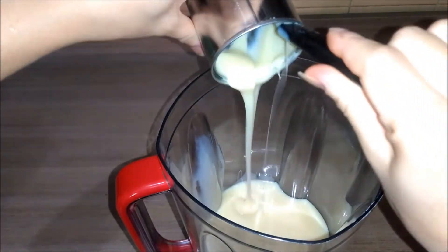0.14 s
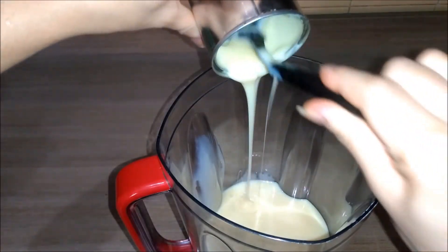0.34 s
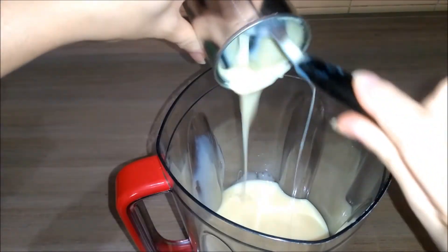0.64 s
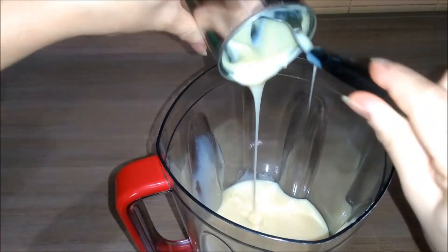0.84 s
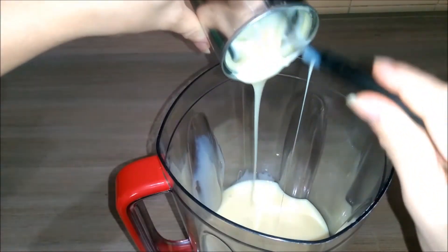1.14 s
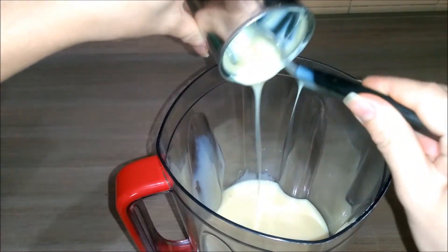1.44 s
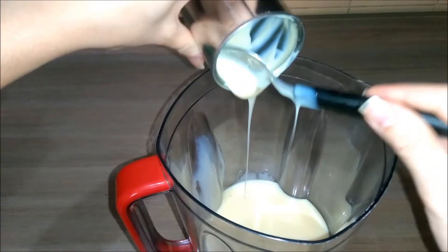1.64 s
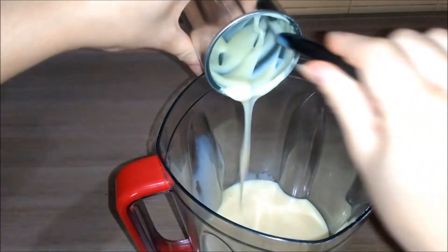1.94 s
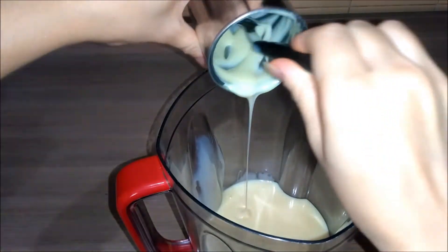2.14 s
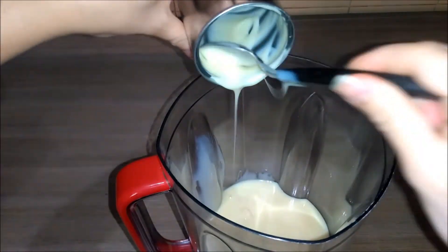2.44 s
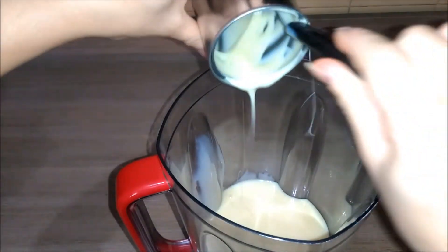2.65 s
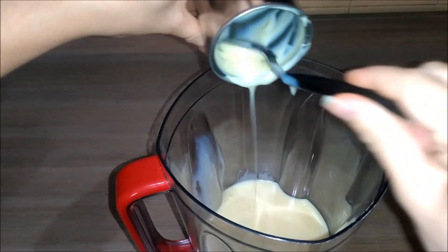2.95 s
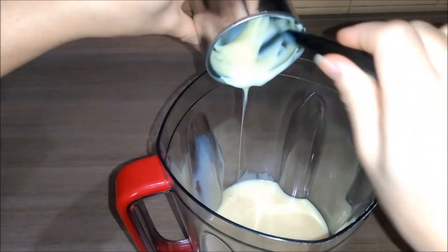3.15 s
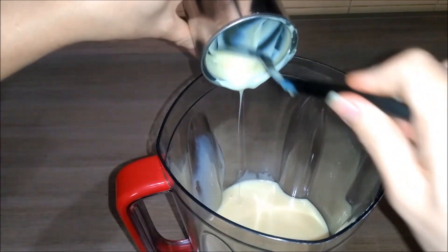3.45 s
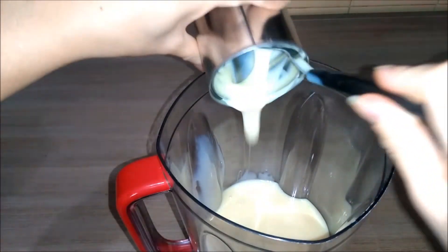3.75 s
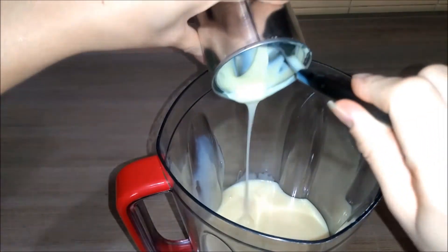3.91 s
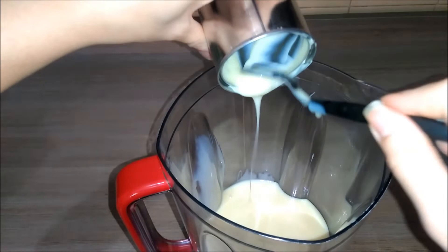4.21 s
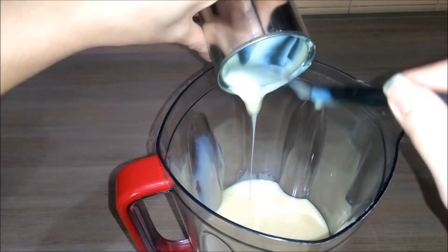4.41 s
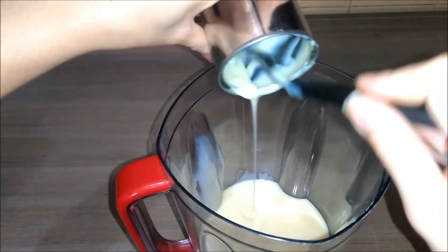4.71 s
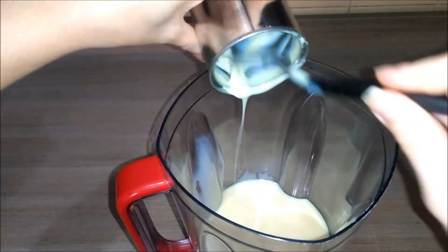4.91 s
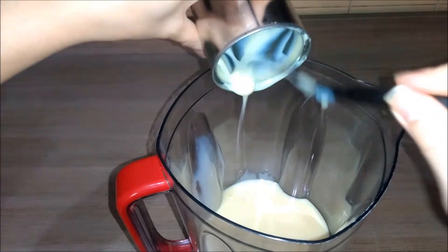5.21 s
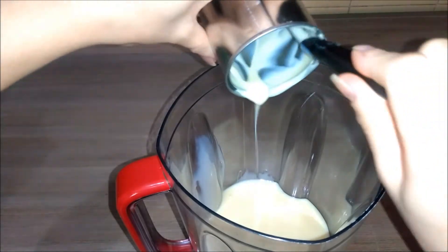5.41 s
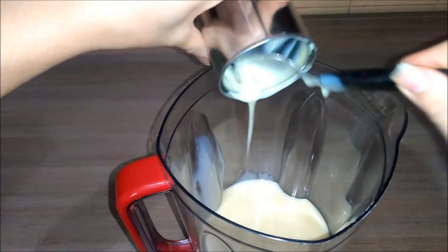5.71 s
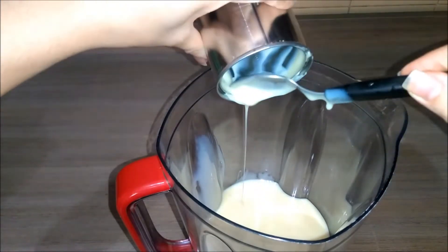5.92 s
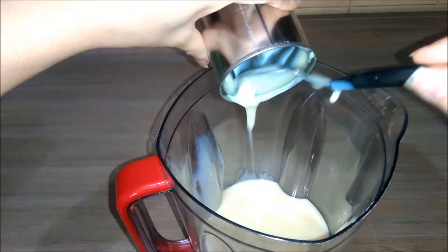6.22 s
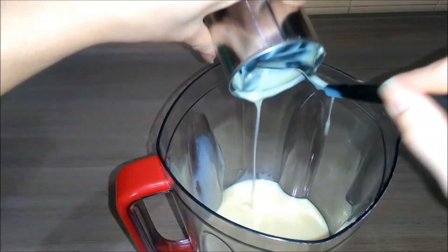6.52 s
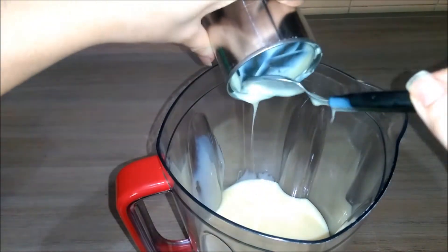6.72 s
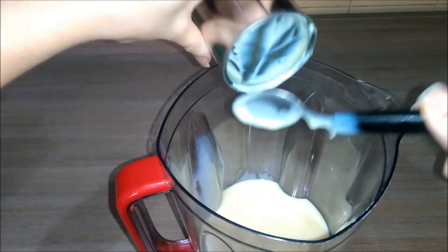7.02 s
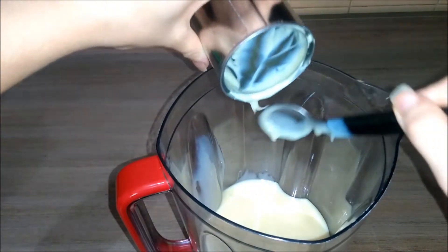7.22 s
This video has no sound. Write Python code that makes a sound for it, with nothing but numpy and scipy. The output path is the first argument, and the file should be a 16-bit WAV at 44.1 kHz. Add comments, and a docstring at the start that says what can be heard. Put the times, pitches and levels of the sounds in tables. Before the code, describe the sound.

Close in a quiet small kitchen, a spoon works around a sticky tin: sharp tinny taps, short gritty scrapes with a wet hiss, faint thin squeaks and soft hand rustle. Two drum-like pops ring out before halfway. Later strokes crowd together, low and groaning, with a weak low hum beneath, ending in two small steel tings. Stereo pickup, brief room tail.

```python
"""A steel spoon scrapes thick, sticky milk out of a hand-held tin in a small kitchen, close to a stereo microphone.
Stick-slip friction rubs the tin's drum-like bottom, its wall and its bright upper modes; the smeared paste hisses.
Knocks ring the same modes as short blows; the bottom twice pops back, flicked steel tings and thin squeaks sing.
Hands rustle on the tin. The room answers with short noise tails, over shaped quiet noise and
low hums made of wavering sines that come and go."""
import sys
import numpy as np
from scipy import signal
from scipy.fft import rfft, irfft, next_fast_len
from scipy.io import wavfile
from scipy.ndimage import uniform_filter1d, map_coordinates

SR = 44100
rng = np.random.default_rng(int(sys.argv[2]) if len(sys.argv) > 2 else 0)


def put_to_file(sound):
    """Save the sound as 16-bit audio at rate SR, in the file named by the first command-line argument."""
    columns = np.atleast_2d(sound).T  # one column per channel
    safe = np.clip(columns, -1, 1)
    whole_steps = np.round(safe * 32767)
    wavfile.write(sys.argv[1], SR, whole_steps.astype(np.int16))


N = 324576
TIME = np.arange(N) / SR
TAIL = TIME[:SR // 2]  # clock of one struck sound
STEP_S = TIME[::SR // 1000]  # coarse clock for the hand's pressure

# Modes of the tin's bottom. Each row: frequency in Hz, relative level in dB, decay by 60 dB in seconds.
BOTTOM = [(353, 11, 0.16), (381, 9, 0.07)]
# Overtones of the bottom, near the octave. Each row: frequency in Hz, relative level in dB, 60 dB decay in seconds.
OVERTONE = [(700.5, 2, 0.15), (745, -16, 0.17), (722, -5.5, 0.096)]
# Modes of the tin's wall. Each row: frequency in Hz, relative level in dB, 60 dB decay in seconds.
WALL = [(915, 12, 0.034), (1008, 17.5, 0.032), (1099, 12.5, 0.042), (1196, 11.5, 0.04), (1334, 5, 0.072),
        (1577, 2, 0.094), (1682, 11.5, 0.062), (1893, 2, 0.073)]
# Thin, faint rings of the steel. Each row: frequency in Hz, relative level in dB, 60 dB decay in seconds.
STEEL = [(3165, 0, 0.5), (3295, -2, 0.33), (3892, -5, 0.35), (3973, -7, 0.4), (4436, -5, 0.4),
         (4566, 2, 0.42), (5408, -5, 0.35), (5782, -5, 0.35), (6551, -5, 0.22), (8413, -5, 0.27)]
# Spoon sweeps through the paste. Each row: start in seconds, length in seconds, levels in dB of wall,
# rasp of steel and hiss of paste, swell of rasp and hiss over the sweep in dB (negative: they sink).
SWEEPS = [(0, 0.071, -45, -50, -59.5, -16.5), (0.289, 0.13, -46, -30.5, -37.5, 6.5),
          (0.611, 0.049, -49, -35.5, -44, -3), (0.713, 0.19, -51, -52, -56.5, 2),
          (1.177, 0.01, -38, -45, -50.5, -11.5), (1.23, 0.13, -51.5, -51, -52.5, 1),
          (1.38, 0.2, -62, -55.5, -59, 3), (1.902, 0.093, -59, -68, -60, -4.5),
          (2.02, 0.095, -74, -50, -62, 3), (2.205, 0.2, -46.5, -31, -37, 18.5),
          (2.788, 0.12, -55, -45, -43.5, 14.5), (3.245, 0.25, -72.5, -44.5, -49.5, 10.5),
          (3.934, 0.17, -50.5, -44.5, -56.5, 3.5), (4.178, 0.094, -36.5, -37.5, -42.5, 3),
          (4.706, 0.086, -47.5, -44.5, -52, -7.5), (5.079, 0.037, -47, -30, -30.5, 3.5),
          (5.31, 0.0086, -39, -38, -43, -1), (5.388, 0.13, -56, -55.5, -58.5, -9.5),
          (5.526, 0.29, -45, -38, -50, 4), (6.27, 0.12, -47, -39.5, -67, 2),
          (6.529, 0.024, -33, -30, -39, 1.5)]
SWEEP_ATTACK_S = 0.057  # pressure builds up over this time ahead of a sweep's start


def undb(db):
    """Decibels to gain."""
    return np.exp(np.asarray(db) * (np.log(10) / 20))


def unit(x):
    """Scale to rms 1."""
    return x / np.sqrt(np.mean(x ** 2))


def colour(x, points):
    """Filter by a spectrum of (Hz, dB) points."""
    hz, db = np.transpose(points)
    size = next_fast_len(x.shape[-1] + 2048)
    f = np.fft.rfftfreq(size, 1 / SR)
    gain = undb(np.interp(np.log(f + 1), np.log(hz), db))
    return irfft(rfft(x, size) * gain, size)[..., :x.shape[-1]]


def through(x, response):
    """Convolve, keeping the length."""
    return signal.fftconvolve(x, response)[:len(x)]


def fade(t60):
    """Decay of 60 dB in t60 seconds, never shorter than 1 ms."""
    return np.exp(-np.log(1000) * TAIL / max(t60, 1e-3))


def walk(rate):
    """Random wandering: straight lines between normal random points, rate points a second."""
    knots = rng.standard_normal(4096)
    return np.interp(TIME * rate, np.arange(len(knots)), knots)


def ring(modes, bend=0., rise_s=1e-4):
    """Damped modes; the spoon's pressure stiffens the sheet and lifts their pitch at first."""
    clock = TAIL + bend * 0.022 * (1 - np.exp(-TAIL / 0.015))
    out = sum(undb(db) * fade(t60) * np.sin(2 * np.pi * hz * clock) for hz, db, t60 in modes)
    return out * (1 - np.exp(-TAIL / rise_s))


def struck(modes, centre_hz, focus_db, detune):
    """Each contact point favours the modes near one pitch and detunes them a little."""
    chance = np.clip(rng.standard_normal(len(modes)), -2, 2)
    return [(hz * (1 + detune * c), db - focus_db * np.log2(hz / centre_hz) ** 2, t60)
            for (hz, db, t60), c in zip(modes, chance)]


def radiate(x, corner_hz):
    """A small sheet of metal gives off almost no bass."""
    return signal.sosfilt(signal.butter(3, corner_hz, "high", fs=SR, output="sos"), x)


def diffuse(size):
    """Stereo noise from all around: most alike in the low middle, where the side signal is weak."""
    mid, side = rng.standard_normal((2, size))
    side = colour(side, [(130, 5.5), (350, -8.0), (750, -7.5), (1400, 4),
                         (2400, -0.5), (5000, 0.5), (9000, -2.5)])
    return np.array([mid + side, mid - side])


def kitchen(x, wet_db, lead_ms, pan_db):
    """Direct sound reaches the left port first; worktop and jug answer at once, the walls with a short tail."""
    noise = diffuse(len(TAIL)) * (1 - fade(0.005))
    lows = colour(noise, [(1000, -12.0), (4000, -19)])
    # lows ring longer than highs; the early answer is strong and very short
    walls = lows * fade(0.69) + (noise - lows) * fade(0.33)
    tails = walls + undb(6) * noise * fade(0.041)
    wet = unit(np.array([through(x, tail) for tail in tails])) * np.std(x)
    late = map_coordinates(x, [np.arange(N) - lead_ms * SR / 1000], order=3)
    return (np.array([x, late]) + undb(wet_db) * wet) * undb(np.array([[pan_db], [-pan_db]]) / 2)


def add(track, s, sound, db):
    """Place a sound at a time, with the rms level of its first 20 ms set in dB."""
    start = max(int(s * SR), 0)
    part = sound[:N - start] / np.sqrt(np.mean(sound[:SR // 50] ** 2))
    track[start:start + len(part)] += undb(db) * part


def slips(rate, spread_db, judder_db):
    """Stick-slip friction: tiny slips of uneven size, bunched by the judder of the spoon."""
    happens = rng.random(N) < rate / SR
    sizes = rng.choice([-1, 1], N) * undb(spread_db * rng.standard_normal(N))
    return happens * sizes * undb(judder_db * walk(140))


def slide(x, patchy_db, width_hz, rate, glide_hz_s=0):
    """As the contact point travels, groups of neighbouring modes swell, drift in pitch and fade in turn."""
    hz, s, bins = signal.stft(x, SR, nperseg=768)
    knots = rng.standard_normal((512, 512))
    drift = glide_hz_s * np.interp(s, TIME, np.cumsum(1 + walk(7)) / SR)
    place = np.broadcast_arrays((hz[:, None] - drift) / width_hz, s * rate)
    swell = map_coordinates(knots, place, order=1, mode="mirror")
    return signal.istft(bins * undb(patchy_db * swell), SR)[1][:N]


def scrapes():
    """The spoon's edge chatters over the tin and rubs its modes; the paste crackles finely under it."""
    # Wall pitch favoured by the spot that the spoon rubs. Each row: time in seconds, frequency in Hz.
    contact = [(0.4, 1150), (3.7, 1190), (4.16, 920), (4.3, 1020), (5.85, 1160), (6.38, 980), (6.7, 1060),
               (6.81, 1130), (6.94, 1270)]
    # Hollow of the tin, which colours every rasp. Each row: frequency in Hz, relative level in dB, 60 dB decay in s.
    hollow_modes = [(1100, 0, 0.022), (1330, -10, 0.015), (1780, -5, 0.014), (2050, -13, 0.012)]
    # Spectrum of the rasp, crowded upper modes of tin and spoon. Each row: frequency in Hz, gain in dB.
    rasp_spectrum = [(1800, -3), (2300, -2.5), (3200, 5.5), (4300, -3), (5200, -2), (6000, -4), (7200, -33),
                     (12000, -42)]
    # Spectrum of the smeared paste. Each row: frequency in Hz, gain in dB.
    paste_spectrum = [(2000, -2.5), (5000, 8.5), (6500, 2), (8500, 5), (10500, -1), (12200, 2.5),
                      (15000, -1), (16000, -47)]
    grain_glide_hz_s = 1600  # mean upward drift of the resonances as the contact point travels

    bottom_gain, wall_gain, rasp_gain, paste_gain = friction_gains()
    catching = chatter()
    friction = catching * slips(rate=4000, spread_db=1.0, judder_db=-2.0)

    drum = unit(ring(BOTTOM)) + undb(-4.5) * unit(ring(OVERTONE))
    rubbed = unit(radiate(through(friction, drum), corner_hz=343))
    bottom = steady(groan(waver=0.018, swell_db=6) + undb(-3.5) * rubbed)

    wall = radiate(through(friction, ring(WALL)), corner_hz=780)
    wall = favour(wall, np.interp(TIME, *np.transpose(contact)), peak_db=7, octaves=0.13)
    wall = steady(slide(wall, patchy_db=4.5, width_hz=120, rate=16))

    hollow = undb(-10) * unit(through(friction, ring(hollow_modes)))
    crackle = catching * slips(rate=3200, spread_db=3.5, judder_db=3.0)
    rasp = unit(colour(crackle, rasp_spectrum)) + hollow
    rasp = favour(radiate(rasp, corner_hz=920), sweep_pitch(), peak_db=6, octaves=0.22)
    rasp = unit(slide(rasp, patchy_db=5.5, width_hz=150, rate=13, glide_hz_s=grain_glide_hz_s))
    rasp = steady(rasp + undb(-21) * unit(through(friction, ring(STEEL))))

    smear = catching * slips(rate=4100, spread_db=-1, judder_db=5.5)
    paste = radiate(colour(smear, paste_spectrum), corner_hz=905)
    paste = steady(slide(paste, patchy_db=4.5, width_hz=532, rate=15, glide_hz_s=grain_glide_hz_s))
    return (kitchen(bottom * bottom_gain, wet_db=-0.5, lead_ms=0.066, pan_db=-0.5)
            + kitchen(wall * wall_gain, wet_db=-15.5, lead_ms=0.064, pan_db=-2.5)
            + undb(-4.5) * kitchen(rasp * rasp_gain, wet_db=5.5, lead_ms=0.074, pan_db=-1.7)
            + undb(1.5) * kitchen(paste * paste_gain, wet_db=6.0, lead_ms=0.032, pan_db=-2.5))


def friction_gains():
    """How strongly bottom, wall, steel and paste sound as the spoon rests, sweeps and scrapes."""
    # Bare edge of the spoon judders over the tin. Each row: start in seconds, length in seconds,
    # levels in dB of bottom, wall and rasp of steel.
    edge_scrapes = [(0.095, 0.0078, -26.5, -44, -42), (0.677, 0.015, -34.5, -41.5, -48),
                    (0.932, 0.042, -33.5, -39.5, -37), (1.156, 0.0065, -27.5, -30.5, -27.5),
                    (1.485, 0.017, -37.5, -73, -72), (1.56, 0.013, -41, -56, -44),
                    (1.892, 0.0099, -40, -66, -67), (3.283, 0.1, -41.5, -75, -47.5),
                    (3.501, 0.014, -37, -53, -42), (3.697, 0.0089, -53, -24.5, -20.5),
                    (3.728, 0.035, -32.5, -34, -48), (4.072, 0.05, -28.5, -35, -60),
                    (4.164, 0.046, -58, -29.5, -33.5), (4.233, 0.09, -39, -39.5, -63),
                    (4.536, 0.0071, -49, -60, -58), (5.04, 0.015, -61, -49, -55),
                    (5.28, 0.0046, -38, -34, -22.5), (5.406, 0.01, -31.5, -43, -51),
                    (5.558, 0.072, -31.5, -44.5, -39), (5.725, 0.062, -29, -34, -52),
                    (5.822, 0.052, -29.5, -35.5, -45), (5.906, 0.14, -38, -45, -57),
                    (6.071, 0.015, -35, -43.5, -53.5), (6.104, 0.02, -28, -35, -47.5),
                    (6.363, 0.038, -28.5, -34.5, -42), (6.473, 0.052, -41.5, -46, -40.5),
                    (6.518, 0.047, -52, -26.5, -37), (6.597, 0.021, -31.5, -30, -34),
                    (6.692, 0.013, -34, -27.5, -36), (6.726, 0.058, -32, -36, -49),
                    (6.797, 0.013, -35, -28.5, -34), (6.894, 0.018, -37, -29, -30.5),
                    (6.925, 0.0046, -30.5, -33, -29.5), (7.298, 0.0064, -36, -39, -44)]
    # The spoon rests on the tin between strokes, until it is lifted out: levels in dB of bottom, wall, rasp, paste.
    resting_db = [-63.5, -74, -91, -71.5]
    lift_s = 6.97
    sweep_release_db_s = 319
    sweep_bottom_db = 1  # bottom relative to the wall: the paste cushions a sweep
    scrape_paste_db = -12  # hiss of paste under a scrape, relative to its rasp

    strokes = [(resting_db, press(0, lift_s, SWEEP_ATTACK_S, release_db_s=124))]
    for s, length_s, wall_db, rasp_db, paste_db, swell_db in SWEEPS:
        # the tin's body sounds evenly; rasp and hiss follow the swell
        even = press(s, length_s, SWEEP_ATTACK_S, sweep_release_db_s)
        swelling = press(s, length_s, SWEEP_ATTACK_S, sweep_release_db_s, swell_db)
        levels = [wall_db + sweep_bottom_db, wall_db, rasp_db, paste_db]
        strokes.append((levels, np.array([even, even, swelling, swelling])))
    for s, length_s, bottom_db, wall_db, rasp_db in edge_scrapes:
        pressure = press(s, length_s, attack_s=0.02, release_db_s=445)
        strokes.append(([bottom_db, wall_db, rasp_db, rasp_db + scrape_paste_db], pressure))
    power = sum((undb(db)[:, None] * pressure) ** 2 for db, pressure in strokes)
    return [np.interp(TIME, STEP_S, gain) for gain in np.sqrt(power)]


def press(start_s, length_s, attack_s, release_db_s, swell_db=0):
    """Pressure of one stroke: it takes hold ahead of the start, swells towards its end and is released."""
    since = STEP_S - start_s
    length_s = max(length_s, 1e-3)
    attack = np.clip(1 + since / max(attack_s, 1e-3), 0, 1) ** 2
    to_go = np.clip(1 - since / length_s, 0, 1)
    release_db = release_db_s * np.maximum(since - length_s, 0)
    return attack * undb(-swell_db * to_go ** 2 - release_db)


def chatter():
    """Strength of the friction as the edge sticks and slips: each slip starts sharply and has its own size."""
    rate_hz, spread = 135, 0.35  # median rate and its wander in natural-log units
    slip_share = 0.55  # decay constant of one slip, as a share of its cycle
    cycles = np.cumsum(rate_hz * np.exp(spread * walk(90))) / SR
    sizes = undb(1.8 * rng.standard_normal(4096))
    return unit(sizes[cycles.astype(int)] * np.exp(-(cycles % 1) / slip_share))


def groan(waver, swell_db):
    """Stick and slip lock onto the tin's bottom: it sings its lowest mode and the octave above."""
    phase = 2 * np.pi * BOTTOM[0][0] * (TIME + waver * np.cumsum(walk(60)) / SR)
    lowest = undb(swell_db * walk(25)) * np.sin(phase)
    octave = undb(swell_db * walk(45)) * np.sin(2 * phase) / 1.1
    return unit(lowest + octave)


def steady(x, span_s=0.031):
    """The hand's grip damps the swings of a rubbed resonance, so its level follows the stroke."""
    power = uniform_filter1d(x ** 2, int(span_s * SR))
    return x / np.sqrt(power + 0.41 * np.mean(power))


def favour(x, centre_hz, peak_db, octaves):
    """A resonance whose centre moves with time."""
    hz, s, bins = signal.stft(x, SR, nperseg=512)
    away = np.log2((hz[:, None] + 1) / np.interp(s, TIME, centre_hz)) / octaves
    return signal.istft(bins * undb(peak_db / (1 + away ** 2)), SR)[1][:N]


def sweep_pitch():
    """Each sweep starts low and brightens, up to a ceiling, as the spoon is drawn towards the rim."""
    start_hz, rise_hz_s, top_hz = 2660, 11000, 4430
    hz = np.full(N, float(top_hz))
    for s, *_ in SWEEPS:
        rising = np.clip(start_hz + rise_hz_s * (TIME - s), start_hz, top_hz)
        hz = np.where(TIME > s - SWEEP_ATTACK_S, rising, hz)
    return hz


def knocks():
    """Each blow shares its energy between bottom, wall and upper modes, by where and how hard it lands."""
    # Spoon strikes tin. Each row: start in seconds, levels in dB ahead of the layer mix of bottom, bottom overtone,
    # wall and clink, wall pitch favoured by the contact in Hz, decay constant of the skid after the blow in seconds.
    strikes = [(0.058, -44, -35, -40, -40.5, 1100, 0.005), (0.066, -17, -23, -15.5, -37, 1140, 0.0059),
               (0.256, -38, -40.5, -28.5, -37, 1290, 0.0016), (0.583, -32.5, -32, -16.5, -27, 1530, 0.0034),
               (0.902, -31, -55, -41, -77, 1150, 0.0039), (1.137, -35, -40, -16, -29.5, 1150, 0.0095),
               (2.556, -30, -29, -45, -34, 1550, 0.00091), (2.588, -28, -27, -24, -39, 1400, 0.01),
               (3.102, -36, -36.5, -55, -37.5, 1600, 0.0013), (3.107, -32, -29, -27.5, -43, 1520, 0.004),
               (3.675, -38.5, -30.5, -18.5, -30.5, 1630, 0.0057), (3.97, -45.5, -44, -45, -61, 1160, 0.003),
               (4.075, -30.5, -41, -30, -49.5, 1580, 0.01), (4.616, -39.5, -36, -42, -53.5, 1440, 0.035),
               (5.007, -25, -30.5, -29, -32, 1680, 0.0012), (5.152, -33, -45, -26.5, -46, 1170, 0.01),
               (5.274, -37.5, -53, -19.5, -36.5, 1410, 0.014),
               (5.761, -33.5, -57, -23.5, -39.5, 1240, 0.0072),
               (6.251, -29, -36, -17.5, -27.5, 1550, 0.004), (6.955, -33.5, -46, -30, -30, 1330, 0.00088),
               (7.308, -32, -55, -19.5, -27, 1610, 0.0007)]
    # Spectrum of the clink, crowded upper modes of tin and spoon. Each row: frequency in Hz, gain in dB.
    clink_spectrum = [(1800, 5), (2400, 9.5), (3200, 4.5), (4200, 4.5), (5100, 1.5), (5900, 0),
                      (7200, -8.5), (8500, -4), (10500, -15.5), (14800, -10), (16000, -61)]

    bottom, overtone, wall, clink, click = np.zeros((5, N))
    for s, bottom_db, overtone_db, wall_db, clink_db, wall_hz, skid_s in strikes:
        force = blow(skid_s, skid_db=-7.5)
        add(bottom, s, ring(BOTTOM, bend=0.033, rise_s=0.008), bottom_db)
        add(overtone, s, ring(OVERTONE, bend=0.0084, rise_s=0.0013), overtone_db)
        wall_ring = through(force, ring(struck(WALL, wall_hz, focus_db=79, detune=0.033)))
        add(wall, s, radiate(wall_ring, corner_hz=567), wall_db)
        crowd = colour(rng.standard_normal(len(TAIL)) * fade(0.032), clink_spectrum)
        steel = ring(struck(STEEL, centre_hz=4000, focus_db=-6.0, detune=0.00089))
        add(clink, s, through(force, unit(crowd) + undb(-15) * unit(steel)), clink_db)
        add(click, s, crack(t60=0.007), clink_db)
    clink = radiate(clink, corner_hz=765)
    return (undb(0.3) * kitchen(bottom, wet_db=-7.0, lead_ms=0.0087, pan_db=3.5)
            + undb(-0.5) * kitchen(overtone, wet_db=6.0, lead_ms=0.0098, pan_db=1.0)
            + undb(-7.0) * kitchen(wall, wet_db=-16.5, lead_ms=0.046, pan_db=-2.0)
            + undb(-0.3) * kitchen(clink, wet_db=4.0, lead_ms=0.03, pan_db=-1.0)
            + kitchen(click, wet_db=-5, lead_ms=0.06, pan_db=-1.5))


def blow(skid_s, skid_db):
    """Contact force: one sharp tap, then tiny bounces as the spoon skids on."""
    bounces = rng.standard_normal(len(TAIL)) * (rng.random(len(TAIL)) < 1500 / SR)  # 1500 a second
    force = undb(skid_db) * bounces * np.exp(-TAIL / max(skid_s, 1e-3))
    force[0] = 1
    return force


def crack(t60):
    """The first instant of hard contact: a very short, broadband click."""
    burst = rng.standard_normal(len(TAIL)) * fade(t60)
    return colour(burst, [(600, -6), (1400, 7.5), (6000, 4.5), (10000, -2), (15000, -5.5)])


def pops():
    """The bottom snaps back with a dull thud and a crinkle, and sounds its lowest mode and the octave above."""
    # The pushed-in bottom pops back. Each row: start in seconds, levels in dB of bottom, overtone and thud,
    # pitch at the pop in Hz, pitch it settles to in Hz.
    snaps = [(2.607, -14.5, -17, -30, 374, 357), (3.1175, -13, -18.5, -32, 362, 353)]
    # The undamped thud. Each row: frequency in Hz, relative level in dB, 60 dB decay in seconds.
    thud_modes = [(264, 0, 0.1)]
    # Neighbouring modes that beat against the pop. Each row: frequency in Hz, relative level in dB, 60 dB decay in s.
    neighbours = [(394, 0, .1), (698, -2, .16), (778, -3, .08)]

    out = np.zeros(N)
    for s, bottom_db, overtone_db, thud_db, hz, rest_hz in snaps:
        add(out, s, ring(thud_modes, rise_s=0.0051), thud_db)
        add(out, s, ring(neighbours, rise_s=0.0014), -32)
        # the wall crinkles as the sheet buckles
        crinkle = ring(struck(WALL, centre_hz=1020, focus_db=28, detune=0.011))
        add(out, s, through(blow(skid_s=0.004, skid_db=6), crinkle), -35)
        add(out, s, pop(hz, rest_hz, ring_db=-12, ring_t60=0.3), bottom_db)
        add(out, s, pop(2 * hz, 2 * rest_hz, ring_db=-14, ring_t60=0.4), overtone_db)
    return kitchen(radiate(out, corner_hz=140), wet_db=-10, lead_ms=0.01, pan_db=2.5)


def pop(hz, rest_hz, ring_db, ring_t60):
    """One mode of the popping sheet: a strong first swing, then a weaker ring that sags in pitch."""
    rise_s, swing_t60_s, glide_s = 0.0035, 0.08, 0.034
    pitch = rest_hz + (hz - rest_hz) * np.exp(-TAIL / glide_s)
    decay = fade(swing_t60_s) + undb(ring_db) * fade(ring_t60)
    swing = (1 - np.exp(-(TAIL / rise_s) ** 2)) * decay
    return swing * np.sin(2 * np.pi * np.cumsum(pitch) / SR)


def rebounds():
    """With the spoon clear of it, the tin rings on undamped."""
    # Each row: start in seconds, levels in dB of bottom and wall.
    releases = [(.067, -30.5, -30), (2.62, -32, -53), (3.13, -33, -56)]
    # Bottom without the spoon. Each row: frequency in Hz, relative level in dB, 60 dB decay in seconds.
    free_bottom = [(353, -1, .44), (706, -2, .48), (750, -5, .48)]
    # Wall without the spoon. Each row: frequency in Hz, relative level in dB, 60 dB decay in seconds.
    free_wall = [(1345, 0, 0.5), (1105, -11, 0.25)]
    out = np.zeros(N)
    for s, bottom_db, wall_db in releases:
        add(out, s, ring(free_bottom, rise_s=0.0061), bottom_db)
        add(out, s, ring(free_wall, rise_s=0.00039), wall_db)
    return kitchen(out, wet_db=0.5, lead_ms=0.042, pan_db=-0.5)


def flicks():
    """The spoon's bare bowl flicks off the rim: steel leaves steel with a short, bright ting."""
    # Each row: start in seconds, level in dB.
    tings = [(2.56, -60), (6.955, -24.5), (7.311, -28.5)]
    # Modes of the spoon's bowl. Each row: frequency in Hz, relative level in dB, 60 dB decay in seconds.
    bowl = [(3010, -13, 0.077), (3700, 16, 0.0081), (3930, -6.5, 0.069), (4206, 4.5, 0.037),
            (5670, 9.5, 0.02)]
    out = np.zeros(N)
    for s, db in tings:
        add(out, s, ring(struck(bowl, centre_hz=4100, focus_db=14.0, detune=0.0037)), db)
    return kitchen(out, wet_db=-1.0, lead_ms=0.089, pan_db=-11.0)


def squeaks(waver=0.035, length_s=0.05):
    """Now and then the edge catches and one high mode squeals, unsteady in pitch."""
    # Thin squeaks of steel on steel. Each row: centre in seconds, mean pitch in Hz, peak level in dB.
    squeals = [(.88, 3760, -47), (1.29, 3760, -49), (2.76, 4650, -47), (3.28, 4780, -48), (5.45, 4740, -44)]
    clock = TIME + waver * np.cumsum(walk(310)) / SR
    out = np.zeros(N)
    for s, hz, db in squeals:
        swell = np.exp(-((TIME - s) / length_s) ** 2)
        out += undb(db) * swell * np.sin(2 * np.pi * hz * clock)
    return kitchen(out, wet_db=4.0, lead_ms=0.11, pan_db=-8)


def rubbing():
    """Hands shift on the tin and the thick paste folds over: a soft, uneven rustle."""
    # Muffled rubbing of hands and paste. Each row: time in seconds, level in dB ahead of a 14 dB cut.
    rub_levels = [(0.0, -25.5), (0.45, -37), (3.18, -42), (3.22, -45.5), (4.08, -38.5), (5.02, -42.5),
                  (5.18, -36.5), (6.5, -39), (6.84, -36), (7.05, -74), (7.36, -39)]
    rustle = colour(slips(rate=6000, spread_db=0.0, judder_db=7.0),
                    [(70, -17.0), (140, -10.5), (260, -2.0), (520, -8.5), (900, -15.0), (2500, -44.5)])
    rustle = slide(rustle, patchy_db=4.5, width_hz=91, rate=31)
    gain = undb(np.interp(TIME, *np.transpose(rub_levels)) - 14.0)
    return kitchen(unit(rustle) * gain, wet_db=2.5, lead_ms=0.038, pan_db=-2.7)


def background():
    """Quiet kitchen air, as noise of a set spectrum, and two low hums."""
    # Spectrum of the kitchen air. Each row: frequency in Hz, gain in dB.
    floor = [(25, -47), (55, -21), (120, 3.5), (240, -17.5), (400, 1), (700, -30), (2000, -17.5),
             (3200, -18.5), (5000, -37), (12000, -35), (15000, -48), (16000, -53)]
    # Lines of the early hum. Each row: frequency in Hz, relative level in dB.
    early_lines = [(53.8, -3), (107.7, 4)]
    # Swell of the early hum. Each row: time in seconds, level in dB.
    early_swell = [(0, -55.5), (.54, -58.5), (.72, -82)]
    # Lines of the late hum. Each row: frequency in Hz, relative level in dB.
    late_lines = [(79, -3.5), (111.5, -15), (118.4, -11.5), (156, -27)]
    # Swell of the late hum. Each row: time in seconds, level in dB.
    late_swell = [(0, -70), (4.95, -63), (5.55, -45), (5.82, -54), (6.12, -44.5), (6.27, -49), (6.57, -43),
                  (6.79, -50), (6.91, -45), (7.1, -62)]
    air = unit(colour(diffuse(N), floor)) * undb(-50.5 + 0.19 * walk(3.7))
    return air + hum(early_lines, early_swell, pan_db=-18.0) + hum(late_lines, late_swell, pan_db=-7.5)


def hum(lines, swell, pan_db):
    """A low hum of sines that waver in pitch and level."""
    clock = TIME + 0.028 * np.cumsum(walk(9)) / SR
    tone = sum(undb(db + 2.5 * walk(9)) * np.sin(2 * np.pi * hz * clock) for hz, db in lines)
    level_db = np.interp(TIME, *np.transpose(swell)) + np.array([[pan_db], [-pan_db]]) / 2
    return np.sqrt(2) * tone * undb(level_db)


def scene():
    """Knocks, scrapes and handling over the kitchen's background."""
    return (knocks() + pops() + rebounds() + flicks()
            + scrapes() + squeaks() + rubbing() + background())


def record(dry):
    """The recorder widens the stereo by subtracting a delayed share of the other channel; the top is cut off steeply."""
    # Share of the opposite channel that is subtracted. Each row: frequency in Hz, share from 0 to 1.
    crossfeed = [(500, 0.1), (1200, 0.46), (2550, 0.88), (5000, 0.53), (7500, 0.37), (10200, 0.027),
                 (13000, 0.47)]
    delay_s, top_hz = 0.000393, 15500
    f = np.fft.rfftfreq(2 * N, 1 / SR)
    share = np.clip(np.interp(f, *np.transpose(crossfeed)), 0, 1)
    ports = rfft(dry, 2 * N)
    crossed = share * np.exp(-2j * np.pi * f * delay_s) * ports[::-1]
    heard = irfft((ports - crossed) / (1 + share))[:, :N]
    return signal.sosfilt(signal.ellip(8, .2, 70, top_hz, fs=SR, output="sos"), heard)


dry = scene()
out = record(dry)
put_to_file(out)
```